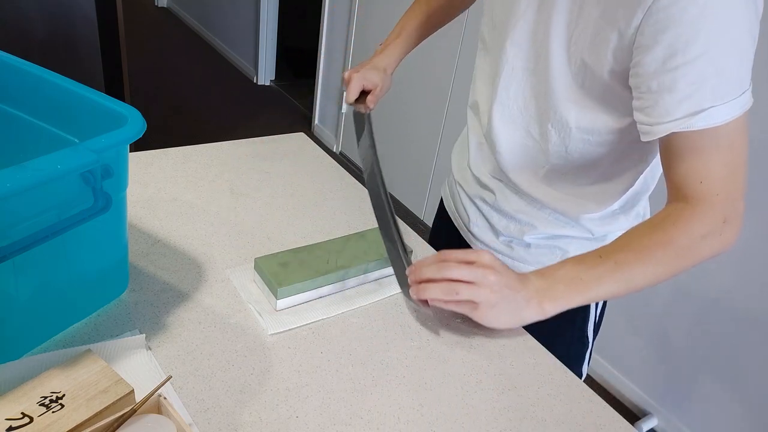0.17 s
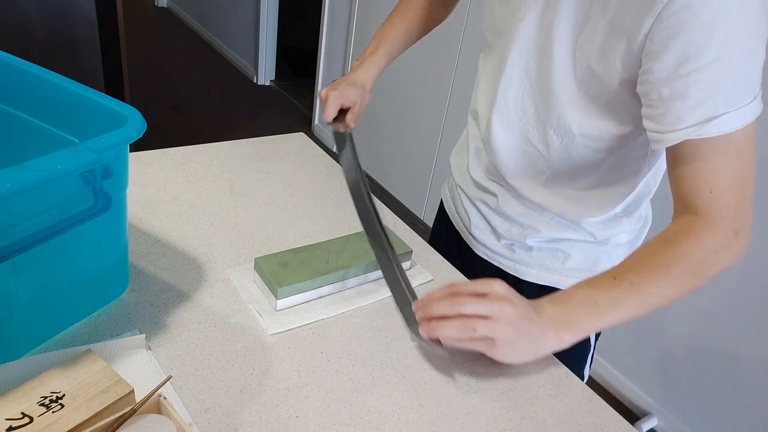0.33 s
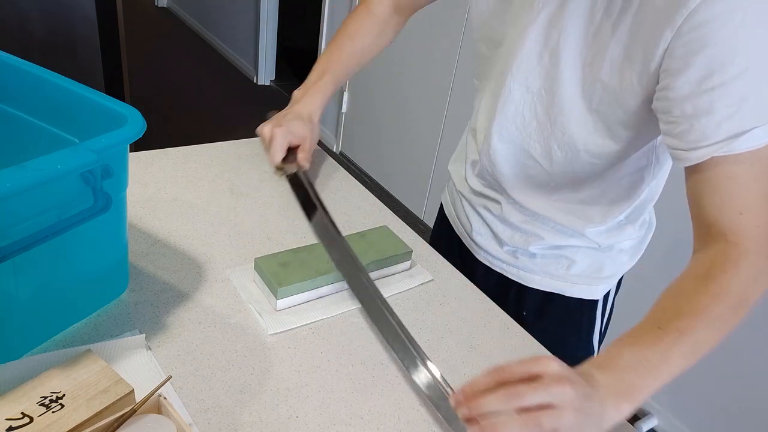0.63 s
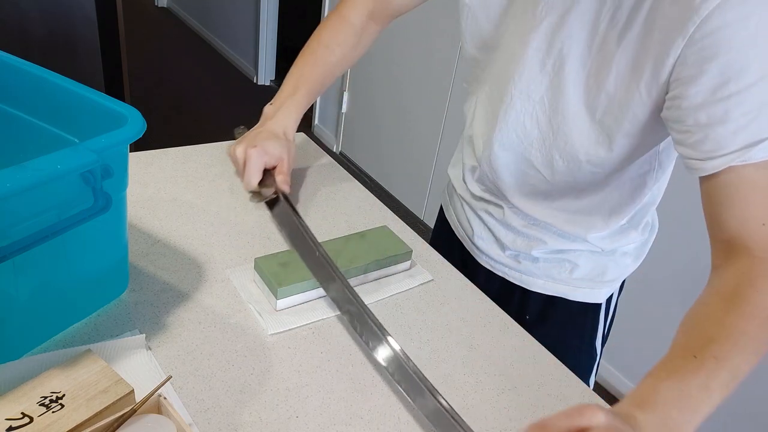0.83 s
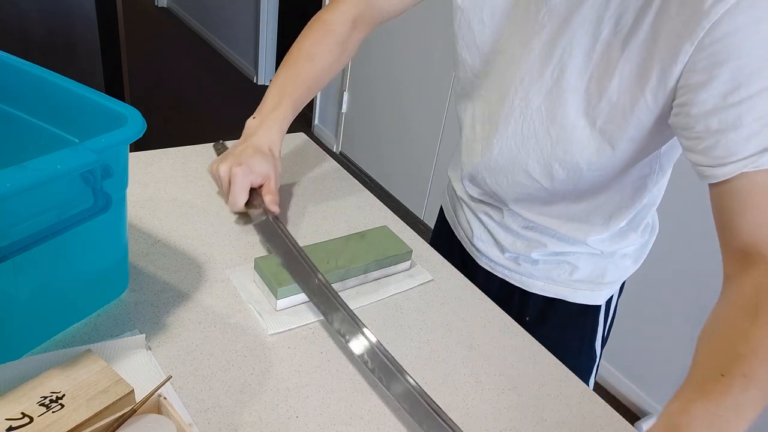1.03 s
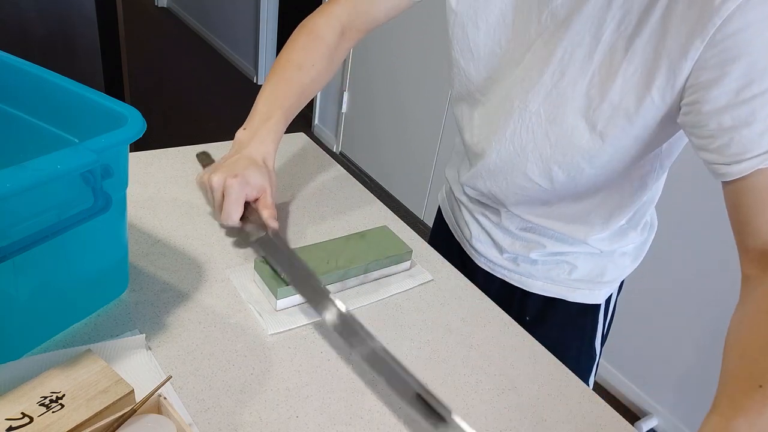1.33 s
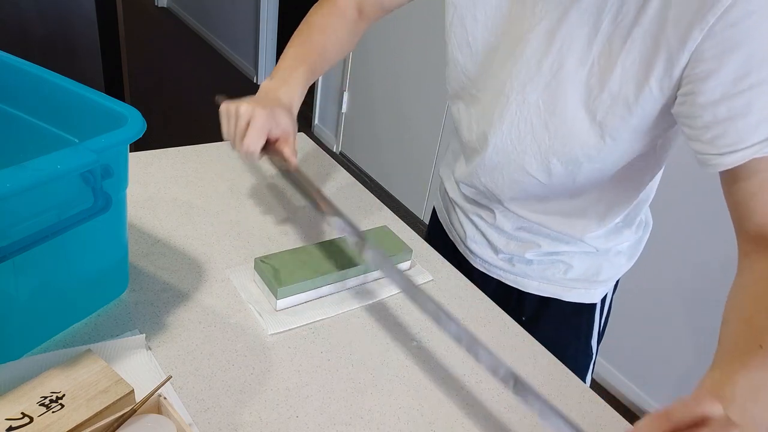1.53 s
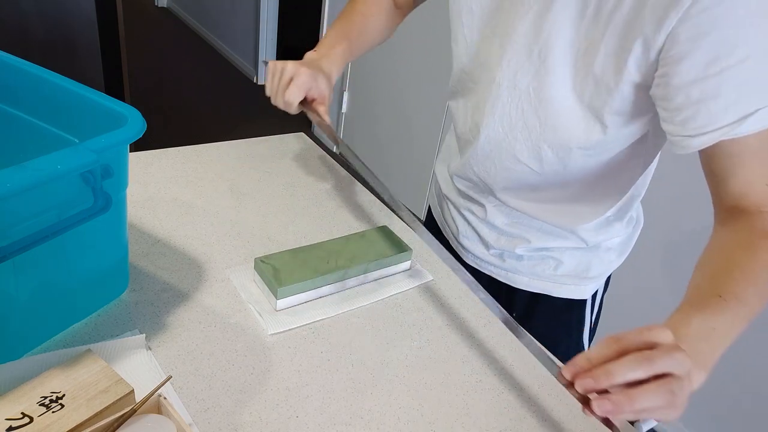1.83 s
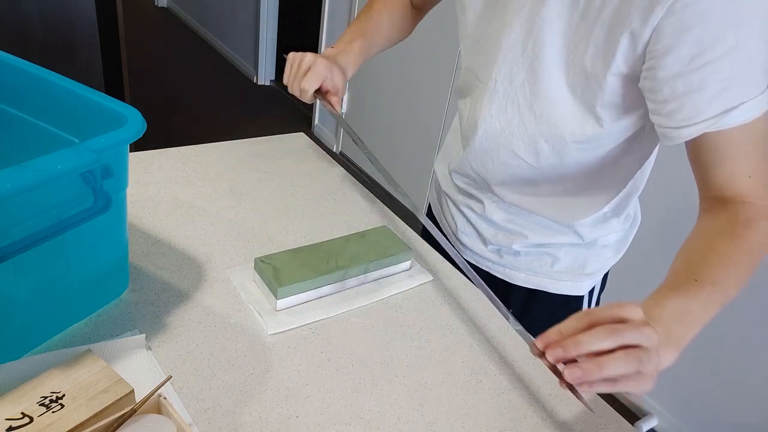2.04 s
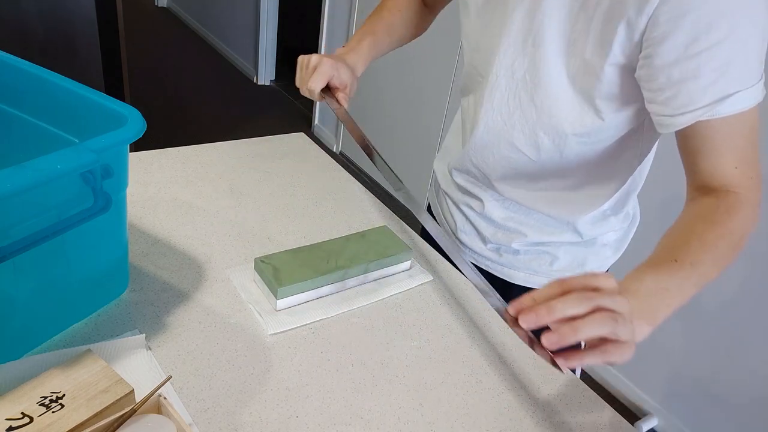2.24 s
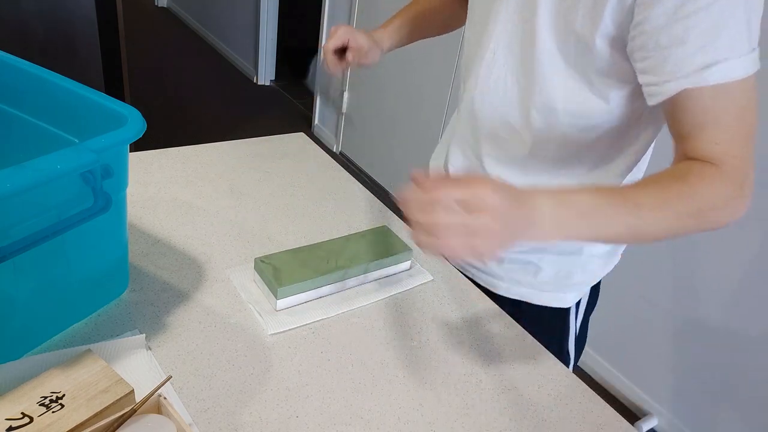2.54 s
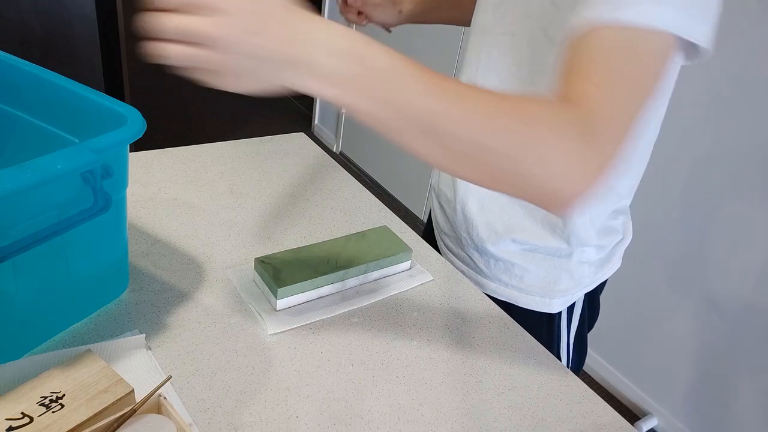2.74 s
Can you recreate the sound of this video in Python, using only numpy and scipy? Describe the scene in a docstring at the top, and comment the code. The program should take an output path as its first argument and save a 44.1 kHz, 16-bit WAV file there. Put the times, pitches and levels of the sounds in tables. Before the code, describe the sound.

A long steel blade is drawn once over a wet whetstone on a table, a bright, hissing, metallic rasp that dips halfway and resumes; then quiet room hum, which swells late. Close stereo microphone, small room.

```python
"""A small humming room: a long steel blade is drawn once, tip to heel, over a wet whetstone on a table.
Random ticks of grit ring the blade's modes, whose strengths change as the contact travels along it.
The push slackens about halfway. Filtered noise makes the slurry's hiss, the table's rumble and the air,
and a wavering tone is a distant motor. A while after the treble falls quiet, the gain rises."""
import sys
import numpy as np
from scipy import signal
from scipy.fft import rfft, irfft
from scipy.io import wavfile
from scipy.ndimage import uniform_filter1d

SR = 44100
rng = np.random.default_rng(int(sys.argv[2]) if len(sys.argv) > 2 else 0)


def dump_mix(stems):
    """Bounce the given channels to the path in sys.argv[1] as a 16-bit WAV at rate SR."""
    frames = np.atleast_2d(stems).T  # one column per channel
    limited = np.clip(frames, -1, 1)  # hard clip at full scale
    pcm = np.round(limited * 32767).astype(np.int16)
    wavfile.write(sys.argv[1], SR, pcm)


N = 127890  # length in samples, 2.9 s


def undb(db):
    """Turn dB into a factor on the amplitude."""
    return 10 ** (np.asarray(db) / 20)


def level(x, db):
    """Scale a sound so its average (RMS) level is db."""
    return x * undb(db) / np.sqrt(np.mean(x ** 2))


def ring(x, hz, width):
    """Pass a sound through one resonance, with gain 1 at its centre."""
    b, a = signal.iirpeak(hz, hz / width, fs=SR)
    return signal.lfilter(b, a, x)


def colour(x, table):
    """Shape the spectrum by (Hz, dB) points, joined by straight lines on a log-frequency axis."""
    hz, db = np.array(table, float).T
    f = np.arange(N // 2 + 1) * SR / N + 1  # the 1 avoids log(0)
    gain_db = np.interp(np.log(f), np.log(np.maximum(hz, 1)), db)
    return irfft(rfft(x) * undb(gain_db), N)


def walk(rate_hz):
    """Make a slow random curve: levels held for 1 / rate_hz seconds, smoothed twice, spread near 1."""
    hold = int(SR / rate_hz)
    held = rng.standard_normal(400)[np.arange(N) // hold % 400]
    return 1.3 * uniform_filter1d(uniform_filter1d(held, hold), hold)


GRIT_PER_S, GRIT_SPREAD_DB = 12000, 2.5  # ticks per second, unevenness of their size
CHATTER_DB, CHATTER_HZ = 0.95, 60  # depth and rate of the grit's uneven loudness
SHARED, RIGHT_LAG_S = 0.28, .0002  # amplitude share of the left ticks in the right, and their delay


def grit():
    """Grit hits the edge in dense, uneven ticks; left and right share part of them, the right a little late."""
    hit, sign = rng.random((2, 2, N))
    size_db = GRIT_SPREAD_DB * np.clip(rng.standard_normal((2, N)), -2.5, 2.5)
    left, other = (hit < GRIT_PER_S / SR) * undb(size_db) * np.sign(sign - .5)
    late_left = np.roll(left, int(RIGHT_LAG_S * SR))
    right = SHARED * late_left + np.sqrt(1 - SHARED ** 2) * other
    return level(np.array([left, right]), 0) * undb(CHATTER_DB * walk(CHATTER_HZ))


# The colour of the wet slurry's hiss. Each row: frequency in Hz, relative strength in dB.
SLURRY_COLOUR = [(300, -27), (500, -4.5), (950, -16), (1220, -9), (1900, -6.5), (2470, -2.5), (3300, -8),
                 (4050, 1.5), (4400, -16), (5500, -5.5), (8700, 0), (10800, -12), (13000, -12.5),
                 (16000, -12)]


def slurry(ticks, low_db, high_db):
    """Wet grit hisses between the blade's modes; its low and high ends change along the stroke."""
    hiss = level(colour(ticks, SLURRY_COLOUR), -2)  # dB beside the ringing modes at 0
    low = signal.sosfilt(signal.butter(2, 1200, fs=SR, output="sos"), hiss)
    high = signal.sosfilt(signal.butter(2, 9800, "high", fs=SR, output="sos"), hiss)
    return hiss + (undb(low_db) - 1) * low + (undb(high_db) - 1) * high


# The blade's modes. Each row: frequency in Hz, width in Hz, then five relative strengths in dB,
# with the stone under the tip, the front, the middle, the rear and the heel.
BLADE_MODES = [(850, 108, -24, -24, -2.5, -12.5, -15), (1408, 54, -2, -18, -3.5, -9, -3),
               (2104, 76, -15, -3.5, -14, -9, -4.5), (2460, 48, 9, -12, -6, -1.5, -6),
               (2613, 40, 0, -5.5, -14, -15.5, -9), (3080, 200, -7, -17, -26.5, -28, -10),
               (3866, 38, -14, -26, -4, -11, -24), (4120, 25, 9.5, -1, -1.5, -6, -11),
               (4696, 166, -0.5, 2.5, -10, -8.5, -7.5), (4920, 28, -14, 3, -24, -14, -2),
               (5285, 44, 1, -5, -6, -9, -6), (5640, 79, -43, 1.5, -8, -13, -8),
               (5995, 39, -1, 2.5, -0.5, 1, 0), (6674, 41, -3, 7, 4, 4, 0), (7340, 80, -6, -1, -9, -5, 1),
               (7430, 72, -9, -1.5, -2.5, -10, -14), (8120, 79, 0, -12, -21, -3, -5),
               (8340, 102, -14, 2.5, -2, -2, -2), (8880, 38, 2, 0, -3, -10, -2),
               (9170, 52, -5.5, 4, 4, 4.5, -1), (9200, 58, -27, 1, -12, -18, -11),
               (9970, 45, -27, -1, -7, -2, -5), (11370, 66, -24, -5, -17.5, -8, -11),
               (12080, 140, -22, -14, -24, -18, -16), (12350, 104, -13, -4, -8.5, -11, -21),
               (13360, 52, -6, -3, -7, -9, -13), (14100, 160, -12, -11, -26, -18, -14),
               (15200, 36, -13, -10, -3, -15, -15)]
# When each of those five parts is on the stone, in seconds.
CONTACT_S = (.13, .36, .73, .92, 1.12)
# Narrow gaps cut from the rasp: the lower four where the blade hardly radiates, the top one a dip high in the
# treble. Each row: frequency in Hz, width in Hz.
DEAD_BANDS = [(1230, 70), (1900, 155), (3330, 53), (4410, 92), (10850, 130)]
WANDER_DB, WANDER_HZ = 3, 20  # random drift of each mode's drive: depth, rate
LEFT_TREBLE_DB = 3.5  # extra treble on the left, reached at 13 kHz


def blade(t, push, low_db, high_db):
    """Grit rings each mode by how freely it moves at the contact, so modes swell and fade as nodes pass."""
    ticks = grit() * push
    modes = 0
    for hz, width, *part_db in BLADE_MODES:
        drive_db = np.interp(t, CONTACT_S, part_db) + WANDER_DB * walk(WANDER_HZ)
        modes = modes + ring(ticks * undb(drive_db), hz, width)
    rasp = level(modes, 0) + slurry(ticks, low_db, high_db)
    rasp = rasp * np.sqrt(np.mean(push ** 2))  # restore the strength that levelling took away
    for hz, width in DEAD_BANDS:
        rasp = rasp - ring(rasp, hz, width)
    rasp[0] = colour(rasp[0], [(8000, 0), (13000, LEFT_TREBLE_DB)])
    return rasp


ECHO_DB, ECHO_T60_S, ECHO_TOP_HZ = -8.5, 0.37, 9150  # strength, time to fall 60 dB, softening of the top


def echo(x):
    """The room answers with a short fading tail of noise, different on left and right."""
    t = np.arange(SR // 2) / SR
    fading = rng.standard_normal((2, len(t))) * undb(-60 * t / ECHO_T60_S)
    tail = level(fading, ECHO_DB) / np.sqrt(len(t))
    b, a = signal.butter(1, ECHO_TOP_HZ, fs=SR)
    soft = signal.lfilter(b, a, x)
    return signal.fftconvolve(soft, tail, axes=1)[:, :N]


# The table top's resonances. Each row: frequency in Hz, width in Hz, relative strength in dB.
TABLE_MODES = [(189, 47, 11), (253.6, 40, 2.5), (330, 33, -5)]


def table(rumble_db):
    """The dragging stone shakes the table top: noise rings its low resonances."""
    shake = rng.standard_normal(N)
    rumble = sum(undb(db) * ring(shake, hz, width) for hz, width, db in TABLE_MODES)
    return undb(rumble_db) * level(rumble, 0)


# The colour of the room's air. Each row: frequency in Hz, relative strength in dB.
AIR_COLOUR = [(6, 3), (20, 1), (65, -12), (130, -13.5), (190, -14), (300, -19.5), (460, -21.5),
              (1000, -29.5), (2140, -37), (4540, -39.5), (9200, -44.5), (10000, -49.5), (11500, -51.5),
              (12500, -45.5), (16000, -41.5)]
# How strongly left and right differ in that air. Each row: frequency in Hz, strength in dB.
AIR_DIFFERENCE = [(60, 3), (110, -8), (200, -1.5), (380, -4), (700, -0.5), (1290, 0.5), (2380, 1.5),
                  (4400, 0), (8120, 0.5), (15000, -0.5)]
# The wavering hum of the building. Each row: frequency in Hz, width in Hz, level in dB.
BUILDING_HUM = [(33.8, 9.6, -55.5), (100.3, 7.9, -59.5), (364.5, 3.6, -70.5)]
AIR_DB, FLICKER_DB = -49.5, -0.1  # level of the part alike on both sides, depth of the flicker


def room():
    """Faintly flickering air is coloured noise; narrow bands of noise hum alike on both sides."""
    mid, side, drone = rng.standard_normal((3, N))
    mid = colour(mid, AIR_COLOUR)
    side = colour(colour(side, AIR_COLOUR), AIR_DIFFERENCE)
    scale = undb(AIR_DB) / np.std(mid)
    flicker = undb(FLICKER_DB * walk(4.25))
    air = scale * flicker * (mid + side * np.array([[1], [-1]]))
    return air + sum(level(ring(drone, hz, width), db) for hz, width, db in BUILDING_HUM)


MOTOR_HZ, MOTOR_DB, MOTOR_WAVER_DB = 129.65, -56.5, 3.5  # middle pitch, level, depth of the level's waver


def motor():
    """A distant motor is a low sine tone that wavers in pitch and level."""
    pitch_hz = MOTOR_HZ * (1 + 0.02475 * walk(13))
    phase = 2 * np.pi * np.cumsum(pitch_hz) / SR
    return level(np.sin(phase) * undb(MOTOR_WAVER_DB * walk(15)), MOTOR_DB)


# The stroke. Each row: time in seconds, strength of the push behind the rasp in dB,
# strength of the table's rumble in dB, then changes to the low end and the high end of the hiss in dB.
STROKE_PATH = [(0.0, -50.5, -47.5, 0, 0), (0.066, -49, -57.5, 0, -6), (0.104, -48.5, -58.5, 0.0039, 0),
               (0.208, -41.5, -47.5, 0, 1), (0.254, -41.5, -50.5, 1, 0), (0.362, -36, -58, 0, -1),
               (0.388, -41.5, -46.5, 0, 0), (0.4, -44, -69, 0, 0), (0.454, -45.5, -54, -8, 0),
               (0.512, -50.5, -59.5, 0, -2), (0.526, -49.5, -69, 0, 0), (0.58, -51, -67, 0, 0),
               (0.61, -47.5, -52, 0, 0), (0.66, -36.5, -55, 0, 8), (0.764, -36.5, -52, 0, 0),
               (0.78, -37, -47.5, 0.0053, 0), (0.956, -39, -57, 0, 0), (1.026, -44.5, -49.5, 0, 3),
               (1.09, -42, -47.5, -6, 0), (1.148, -52.5, -54, 0, 1), (1.274, -52.5, -71, 0, 0.01),
               (1.286, -60, -76, 0, 0), (1.31, -61, -60, 0, 0), (1.336, -64, -75, 0, 0.0034),
               (1.352, -67, -61, 1, 0), (1.5, -79, -60, 0, 0.0097)]


def scene():
    """Add the rasping blade, its echo, the shaken table, the room and the motor."""
    t = np.arange(N) / SR
    s, push_db, rumble_db, low_db, high_db = np.array(STROKE_PATH, float).T
    push = undb(np.interp(t, s, push_db, right=-120))  # practically silent after the stroke
    rasp = blade(t, push, np.interp(t, s, low_db), np.interp(t, s, high_db))
    rumble = table(np.interp(t, s, rumble_db, right=-120))
    return rasp + echo(rasp) + rumble + room() + motor()


QUIET_DB, HOLD_S = -57, 1.075  # treble level that counts as loud, wait after it was last loud
LIFT_DB, LIFT_S, CREEP_DB_PER_S = 10.5, 0.12, 4  # main rise, its time scale, slow further rise
TOP_HZ = 15700  # upper limit of the sound


def record(dry):
    """Once the treble has stayed quiet for a while the gain rises; the very top is cut."""
    t = np.arange(N) / SR
    high_pass = signal.butter(4, 2000, "high", fs=SR, output="sos")
    treble = signal.sosfilt(high_pass, dry.mean(axis=0))
    loud = uniform_filter1d(treble ** 2, SR // 40) > undb(2 * QUIET_DB)  # doubled dB: power
    last_loud = np.maximum.accumulate(t * loud)
    waited = np.maximum(t - last_loud - HOLD_S, 0)
    gain_db = LIFT_DB * (1 - np.exp(-(waited / LIFT_S) ** 2)) + CREEP_DB_PER_S * waited
    top_cut = signal.ellip(12, .3, 70, TOP_HZ, fs=SR, output="sos")
    return signal.sosfilt(top_cut, dry * undb(gain_db))


dry = scene()
out = record(dry)
dump_mix(out)
```